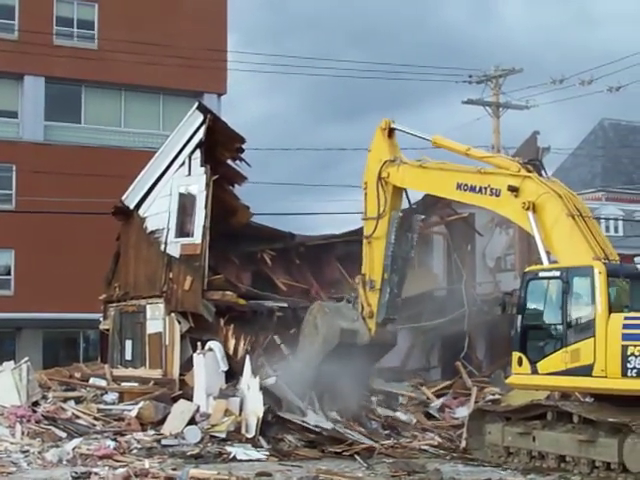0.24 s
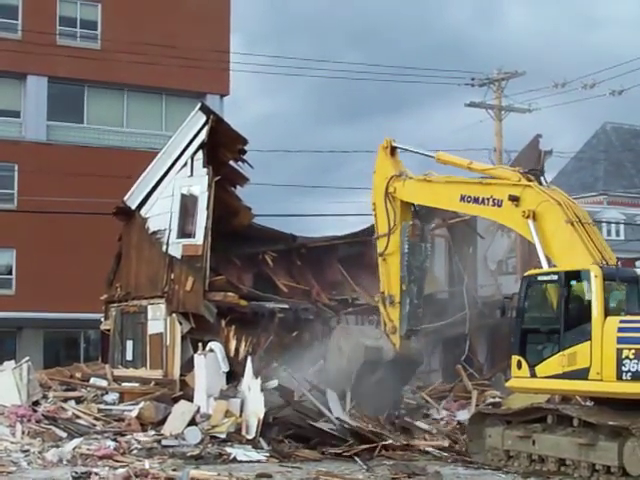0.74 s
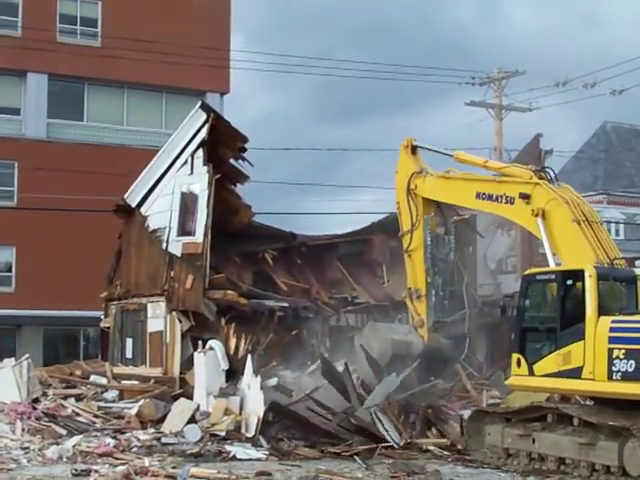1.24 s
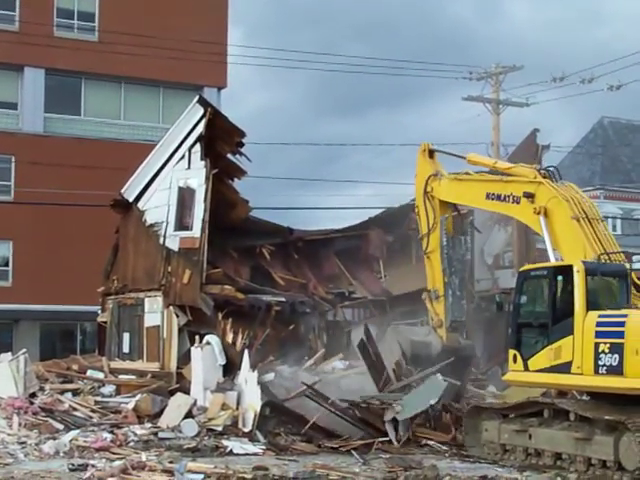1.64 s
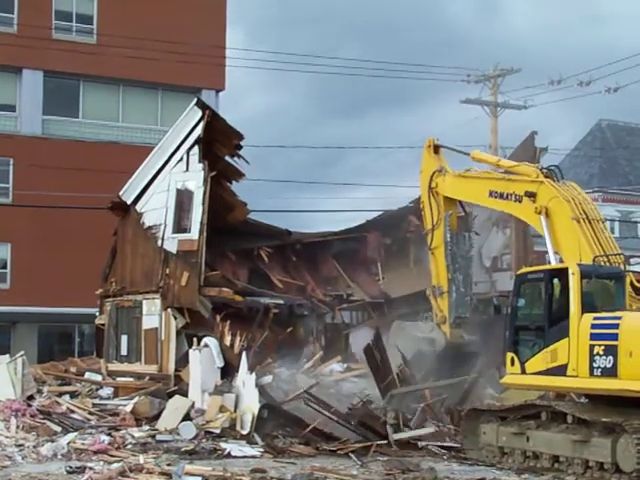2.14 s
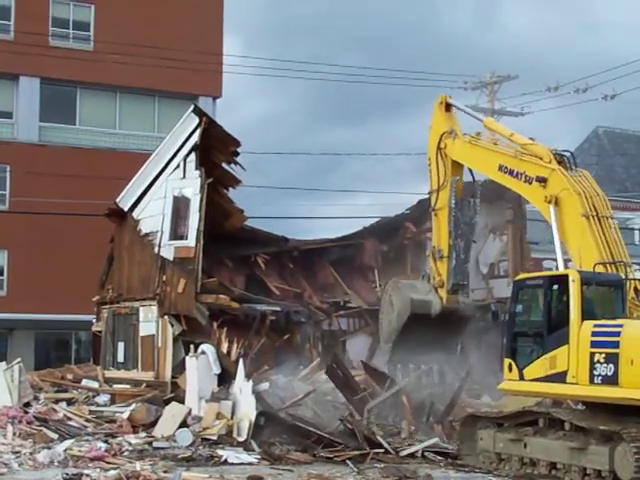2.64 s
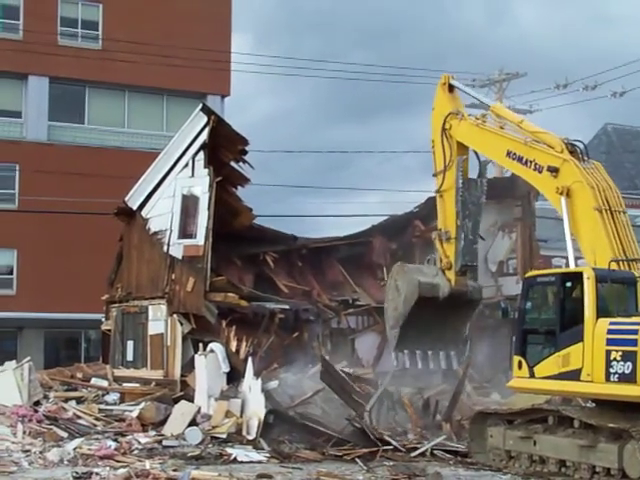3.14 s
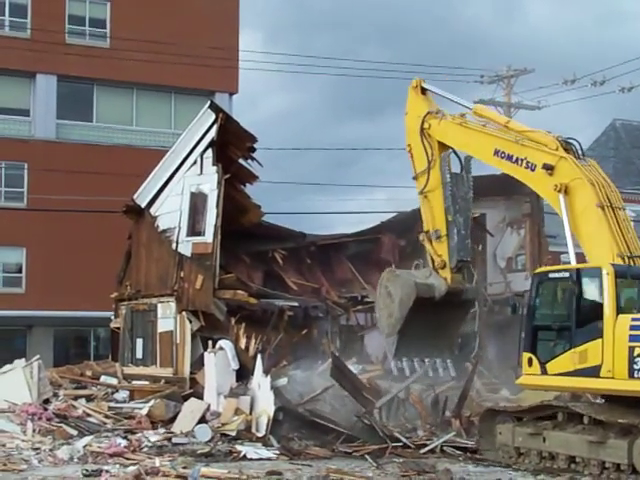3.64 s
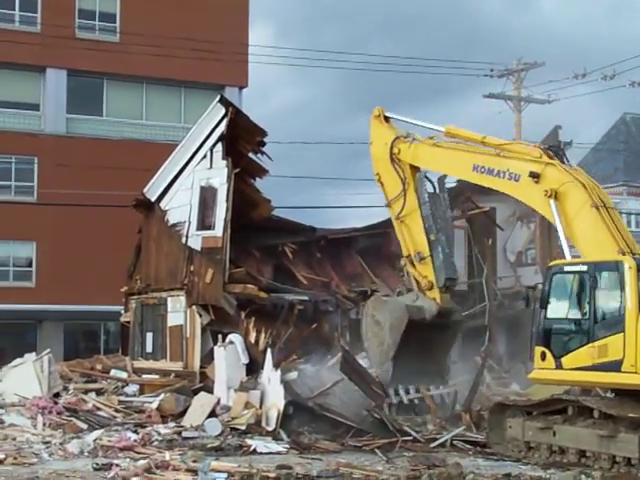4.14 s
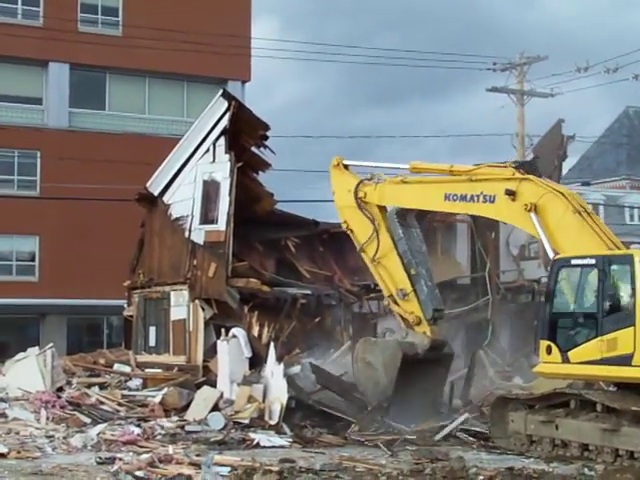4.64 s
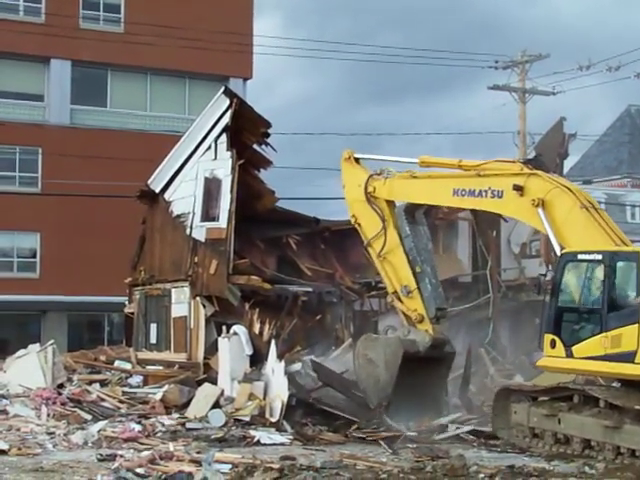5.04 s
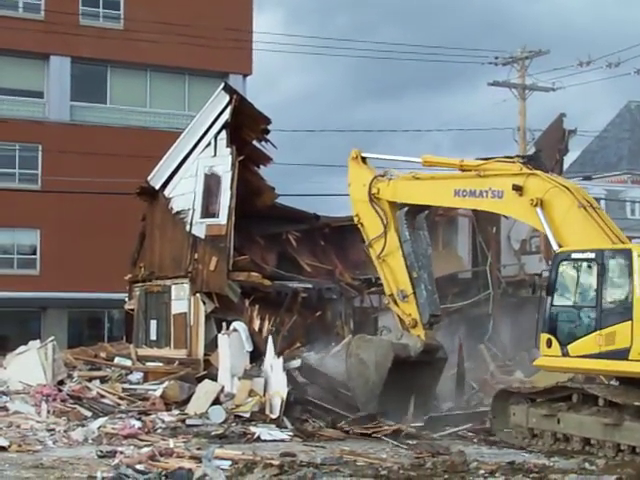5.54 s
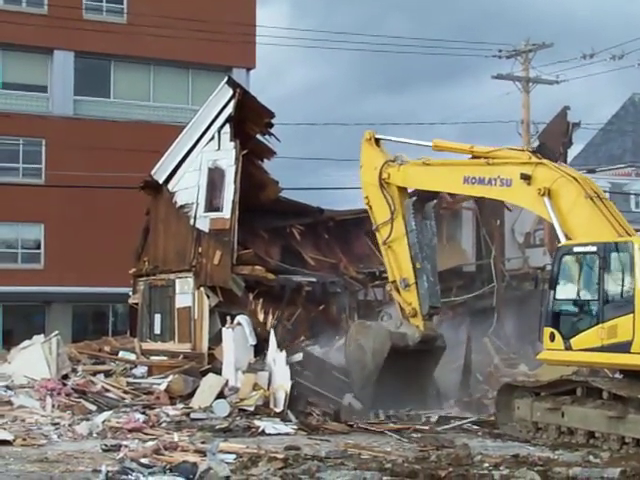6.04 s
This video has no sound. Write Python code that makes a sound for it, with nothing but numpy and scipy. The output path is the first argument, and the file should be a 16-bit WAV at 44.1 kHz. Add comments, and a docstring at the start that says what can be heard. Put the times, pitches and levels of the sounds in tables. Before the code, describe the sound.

From the start a diesel engine hums low and slightly unsteady, with a broad machine roar and boomy exhaust, while wind rumbles and thumps a small stereo camera microphone. In the first 2 s the bucket ploughs through wreckage: dry splinters pour, boards crack sharply around 0.2 and 0.45 s, and a thicker collapse crunches at about 1.1 s, another at 1.7 s. From 2 to 4 s the debris thins to light patter, small snaps and low beam knocks, with frequent hard wind puffs making the sound duck. Loose metal clinks dully near 4 s. At 4.4 s wood breaks again, peaking in the loudest cracking crash at 4.55-4.7 s. A plank clacks and bounces near 5 s; rubble surges at 5.25, 5.85 and 6.1 s over low hydraulic droning. Short street echoes follow the wreckage; a strong puff hits near 6.2 s.

```python
"""A diesel excavator drags its bucket through a wrecked wooden house: splinters and plaster pour down as
knocking fragments, and boards snap as short rings. The pile quiets while the bucket lifts, loose metal clinks
as damped modes near 4 s, and from 4.4 s the bucket comes down again and the hydraulics drone under load.
Throughout, the diesel hums at its firing rate, a brick block echoes the wreckage as a sparse noise tail, and
filtered noise rumbles as wind at two ports of a small camera; hard puffs make the limiter duck either side."""
import sys
import numpy as np
from scipy import signal
from scipy.fft import rfft, irfft
from scipy.io import wavfile
from scipy.ndimage import uniform_filter1d, map_coordinates

SR = 44100
rng = np.random.default_rng(int(sys.argv[2]) if len(sys.argv) > 2 else 0)


def pcm_store(signal):
    """Save signal as 16-bit PCM."""
    levels = np.round(np.clip(np.atleast_2d(signal), -1, 1) * 32767)
    wavfile.write(sys.argv[1], SR, levels.astype(np.int16).T)


N = 278271
TIME = np.arange(N) / SR
BINS = np.fft.rfftfreq(N, 1 / SR)


def amp(db):
    """Decibel law: level in dB to pressure gain."""
    return 10 ** (np.asarray(db) / 20)


def evened(x):
    """Normalisation of mean power: scales to rms 1."""
    return x / np.sqrt(np.mean(x ** 2) + 1e-20)


def read(points, hz):
    """Logarithmic pitch scale: interpolates a spectrum along log frequency."""
    f, value = np.transpose(points)
    return np.interp(np.log(hz + 1), np.log(f), value)


def curves(rows):
    """Linear interpolation: every column of a time table, at every sample."""
    s, *columns = np.transpose(rows)
    return [np.interp(TIME, s, c) for c in columns]


def lowpassed(x, hz, order):
    """Low-pass filtering without phase shift, at half gain at the given frequency."""
    return irfft(rfft(x) / (1 + (BINS / hz) ** order), N)


def coloured(x, colour):
    """Spectral shaping: multiplies the spectrum by a colour, then sets rms 1."""
    return evened(irfft(rfft(x) * amp(read(colour, BINS)), N))


def wander(rate):
    """Band-limited chance: noise of rms 1 with up to about this many turns a second."""
    return evened(lowpassed(rng.standard_normal(N), rate, 4))


def noise_pair(alike):
    """Partial coherence: white noise at two ports with a common share of power (0-1)."""
    common = rng.standard_normal(N)
    separate = rng.standard_normal((2, N))
    return np.sqrt(alike) * common + np.sqrt(1 - alike) * separate


def add(mix, s, sound):
    """Superposition: mixes a sound in from a given time."""
    part = mix[:, max(round(s * SR), 0):][:, :sound.shape[-1]]
    part += sound[..., :part.shape[1]]


def panned(x, pan_db):
    """Level difference between the ears: left over right, in dB."""
    return x * amp(np.array([[pan_db], [-pan_db]]) / 2)


def fragments(per_s, spread_db, top_hz, ring_s, size):
    """Random impacts of damped resonators, each with its own force, pitch, decay and place."""
    count = int(per_s * N / SR)
    when, force, pitch, damping, place = rng.random((count, 5)).T[:, :, None]
    t = np.arange(size) / SR
    decay_s = ring_s * 2 ** (2 * damping - 1)
    # a wider spread makes a few fragments much louder than the rest
    strength = amp(spread_db * np.minimum(-np.log(1 - force), 4)) / np.sqrt(decay_s)
    rings = strength * np.exp(-t / decay_s) * np.sin(2 * np.pi * pitch * top_hz * t)
    at = (when * N).astype(int) + np.arange(size)
    # off-centre fragments reach the nearer port a sample earlier
    arrivals = {1: at + 1, -1: at + (3 * place).astype(int)}
    pan_db = 4 * (2 * place - 1)
    ports = []
    for side in (1, -1):
        heard = rings * amp(side * pan_db / 2)
        ports.append(np.bincount(arrivals[side].ravel(), heard.ravel(), N)[:N])
    out = np.array(ports)
    return out - out.mean(axis=1, keepdims=True)


def collapse(s, build_s, dying_s):
    """Exponential growth and decay: the share of a falling section's peak power."""
    distance = np.maximum((s - TIME) / build_s, (TIME - s) / dying_s)
    return np.exp(-2 * np.minimum(distance, 20))


def shares(splinter_db, pan_db, bright_db):
    """Division of power: between coarse chips and fine grit, at each side."""
    sides = amp(np.array([pan_db, -pan_db]).reshape(2, -1) / 2) ** 2
    sides = sides / sides.mean(axis=0)
    return np.array([sides * amp(splinter_db + tilt * bright_db / 2) ** 2 for tilt in (-1, 1)])


# relative spectrum of splintering wood: pitch_hz, level_db
SPLINTER_COLOUR = [(500, -12.5), (900, -2), (1100, -3), (1370, -9), (1600, -1.5), (1950, -1.5),
                   (2550, -2.5), (3550, -0.5), (4700, -5.5), (6400, -11), (7300, -16.5), (7900, -31.5),
                   (8600, -40)]
# relative spectrum of knocking beams: pitch_hz, level_db
TIMBER_COLOUR = [(150, -6), (380, 7), (600, 1), (850, 3), (1120, 2.5), (1350, -10), (1800, 1.5),
                 (2600, -17.5), (5000, -33.5)]
# bucket ploughing through the pile: time_s, splinter_level_db, timber_level_db, left_over_right_db
DRAG = [(0, -28.5, -42, 13.5), (.4, -28, -30, 0.5), (.71, -27, -29.5, 2), (.76, -25, -32.5, -2),
        (1.3, -29, -31.5, 9), (1.65, -27.5, -32, 0), (2, -31.5, -40, 5), (2.35, -34, -42, 5.5),
        (2.8, -35.5, -33, 3.5), (3.1, -33.5, -34.5, -6), (3.5, -32.5, -31.5, -2), (3.85, -35, -33.5, 2.5),
        (4.2, -34, -34, 5.5), (4.5, -22.5, -35.5, 3), (4.88, -35, -30, 9.5), (5.1, -22, -31.5, -0.5),
        (5.45, -29, -31, 10), (5.7, -27, -32, 3.5), (6.31, -24.5, -36.5, -0.5)]
# sections that give way: peak_s, splinter_level_db, timber_level_db, build_s, dying_s, left_over_right_db,
# grit_over_chips_db
COLLAPSES = [(.195, -20, -30.5, 0.0086, 0.1, 15, 5), (0.753, -20.5, -46, 0.01, 0.048, -10, 9),
             (0.849, -15.5, -34.5, 0.028, 0.014, -3.5, 5.5), (0.989, -21, -43, 0.018, 0.02, -0.5, 9.5),
             (1.083, -12.5, -19, 0.0096, 0.048, 1, 0), (1.24, -22, -31, 0.11, 0.091, 3, -2),
             (1.74, -14.5, -25, 0.022, 0.03, 4.5, 3), (2.45, -30, -29.5, 0.12, 0.13, 24, 0),
             (3.05, -33, -27.5, 0.043, 0.075, -6.5, -13), (3.685, -28, -21.5, 0.014, 0.029, 5.5, 2),
             (4.4, -21, -29.5, 0.015, 0.037, 0, 10), (4.505, -17, -29, 0.033, 0.018, 0, 12),
             (4.556, -6.5, -22, 0.015, 0.042, -0.5, 4), (4.667, -15.5, -15, 0.077, 0.026, 2.5, 16.5),
             (4.808, -30.5, -23, 0.014, 0.028, -1, -22.5), (5.218, -22, -26.5, 0.022, 0.023, -4, 17.5),
             (5.275, -16.5, -24, 0.073, 0.088, 5, -2.5), (5.493, -22.5, -23, 0.011, 0.088, 13, 0),
             (5.849, -19.5, -40, 0.069, 0.017, 1, 0.5), (6.119, -16.5, -25, 0.053, 0.03, 4, 4.5)]


def pile():
    """Granular sound: many small impacts, steady under the bucket and surging as sections fall."""
    splinter_db, timber_db, pan_db = curves(DRAG)
    pouring = shares(splinter_db, pan_db, bright_db=1)
    knocking = amp(timber_db) ** 2
    for s, splinter_db, timber_db, build_s, dying_s, pan_db, bright_db in COLLAPSES:
        surge = collapse(s, build_s, dying_s)
        pouring = pouring + surge * shares(splinter_db, pan_db, bright_db)
        knocking = knocking + surge * amp(timber_db) ** 2
    clumps = wander(24)
    splinters = fragments(per_s=4000, spread_db=0.0, top_hz=8530, ring_s=0.00045, size=160)
    splinters = coloured(splinters, SPLINTER_COLOUR)
    coarse = lowpassed(splinters, 3200, 4)  # big chips sound below, fine grit above
    chips_gain, grit_gain = np.sqrt(pouring)
    splinters = coarse * chips_gain + (splinters - coarse) * grit_gain
    timber = fragments(per_s=700, spread_db=2.5, top_hz=2950, ring_s=0.002, size=640)
    timber = coloured(timber, TIMBER_COLOUR) * np.sqrt(knocking)
    return splinters * amp(1.36 * clumps) + timber * amp(0.4 * clumps)


# boards that snap: start_s, crack_level_db, pitch_hz, tearing_level_db, left_over_right_db
SNAPS = [(0.07, -14, 2700, -19, 3), (0.082, -17, 2480, -30.5, -3), (.1855, -11.5, 2060, -38, 8),
         (0.187, -2.5, 3680, -19, 16.5), (.376, -12, 1980, -30.5, 0.5), (0.4453, 4.5, 2300, -18, 1),
         (.785, -3.5, 4220, -15.5, -7), (1.071, -21, 1530, -13, -0.5), (1.082, -1.5, 3540, -19, 3.5),
         (1.158, 2.5, 3960, -12, 4), (1.388, -14, 1870, -25, 7.5), (1.877, -17, 2270, -20, -1.5),
         (1.968, -22, 3450, -21, 1.5), (2.033, -13.5, 2160, -23.5, 8.5), (2.259, -24, 4630, -29, 2),
         (2.48, -20, 933, -29, 4), (2.918, -16, 2070, -23, -1.5), (3.049, -21, 2050, -28, -2.5),
         (3.381, -18, 5040, -26, 2), (3.484, -7, 3200, -33.5, -2), (3.677, -14.5, 1730, -28.5, 0),
         (3.742, -17.5, 2770, -29, -5.5), (3.81, -19, 2390, -24, 0.5), (4.4212, 0.5, 3470, -14.5, 2),
         (4.5595, 1.5, 3470, -1, -2.5), (4.569, -1.5, 3430, -10.5, 5), (4.617, -4, 2020, -14.5, 2.5),
         (4.6198, 7.5, 2520, 0, 1.5), (4.851, -28, 2930, -17.5, 3.5), (4.934, -13, 3630, -20.5, 2),
         (5.217, -13, 6140, -10.5, 1.5), (5.776, -11, 3970, -17, 1), (5.841, -13, 3440, -24, 12),
         (5.895, -21, 3900, -17.5, 0), (6.092, -12, 3630, -18, 6.5), (6.166, -14, 3250, -20, 7.5),
         (6.261, -11, 3070, -17, 2)]


def snaps():
    """Brittle fracture: a sharp crack, then tearing fibres, both ring the resonance of one board."""
    out, t = np.zeros((2, N)), np.arange(SR // 6) / SR
    for s, crack_db, hz, tearing_db, pan_db in SNAPS:
        u = t * hz / 1.4  # the ring swells and dies within a few cycles
        tone = np.sin(2 * np.pi * hz * t)
        crack = (u * np.exp(1 - u)) ** 2 * tone
        board = np.exp(-t * hz / .7) * tone
        fibres = evened(signal.fftconvolve(rng.standard_normal(len(t)), board)[:len(t)])
        tearing = fibres * np.exp(-t / 0.011)
        add(out, s, panned(amp(crack_db) * crack + amp(tearing_db) * tearing, pan_db))
    return lowpassed(out, 7000, 16)  # keeps the snaps dull above 7 kHz


# beams and planks that drop: start_s, level_db, lowest_mode_hz
THUDS = [(.193, -14.5, 532), (.385, -12.5, 168.3), (1.1, -20.5, 204), (1.318, -17, 840), (1.38, -12.5, 166),
         (2.034, -19.5, 690), (2.478, -13, 553), (2.52, -18, 526), (2.719, -16, 678), (3.365, -10.5, 144),
         (3.01, -16, 166), (4.017, -18, 790), (5.464, -22, 466), (5.92, -14.5, 470)]
# modes of a beam: multiple_of_lowest_mode, level_db
BEAM_MODES = [(1, -2.5), (1.22, -8), (1.6, -10.5), (3.301, -14)]
THUD_CYCLES = 1.83  # periods until each mode is at its fullest


def thuds():
    """Modal vibration: a landing beam knocks on its modes; the lower the mode, the longer it rolls."""
    out, t = np.zeros((2, N)), np.arange(SR // 4) / SR
    for s, db, hz in THUDS:
        for (multiple, mode_db), start in zip(BEAM_MODES, rng.random(len(BEAM_MODES))):
            turns = t * hz * multiple
            u = turns / THUD_CYCLES
            swell = u * np.exp(1 - u)
            add(out, s, amp(db + mode_db) * swell * np.sin(2 * np.pi * (turns + start)))
    return out


def struck(blows, modes, rise_s, chatter, grit_db):
    """Modal impact: each blow crushes grit and rings one object's modes, whose phase (rad) chatters."""
    def dying(t60):
        """Exponential decay: 60 dB in t60 seconds, begun anew by every blow."""
        level = 0
        for s, db in blows:
            age = np.maximum(TIME - s, 0)
            level = level + amp(db - 60 * age / t60) * (1 - np.exp(-age / rise_s))
        return level

    out = amp(grit_db) * dying(t60=.08) * coloured(noise_pair(.8), SPLINTER_COLOUR)
    for hz, db, t60 in modes:
        out = out + amp(db) * dying(t60) * np.sin(2 * np.pi * hz * TIME + chatter * wander(160))
    return out


# blows as a hard plank lands and bounces: start_s, level_db
CLACKS = [(4.9605, -7), (4.9675, -6.5), (4.978, -13)]
# modes of the plank: pitch_hz, level_db, t60_s
PLANK_MODES = [(1965, -8, .055), (2180, -6, 0.053), (3580, -9.5, 0.046)]


def plank():
    """Repeated impact: a bouncing plank excites the same damped modes at every blow."""
    return struck(CLACKS, PLANK_MODES, rise_s=.0006, chatter=0.7, grit_db=-16)


# blows on a loose pipe: start_s, level_db
CLINKS = [(3.993, -16), (4.085, -23.5)]
# modes of the pipe: pitch_hz, level_db, t60_s
PIPE_MODES = [(1432, 1.5, 0.061), (2330, -6.5, .06), (3488, -9, .085)]


def pipe():
    """Inharmonic resonance: a struck loose pipe rings damped modes that form no harmonic series."""
    return struck(CLINKS, PIPE_MODES, rise_s=.002, chatter=.25, grit_db=-13)


# nails and sheet metal that drag: start_s, pitch_hz, width_hz, level_db, length_s
SCRAPES = [(1.919, 5319, 25, -23.5, 0.044), (2.918, 2150, 380, -30.5, 0.15),
           (5.476, 5170, 346, -23.5, 0.058)]


def scrapes():
    """Stick-slip friction: metal on wood squeals on one pitch, whose random phase drift widens the line."""
    out, t = np.zeros((2, N)), np.arange(SR // 4) / SR
    for s, hz, width_hz, db, length_s in SCRAPES:
        stroke = abs(np.sin(np.pi * np.sqrt(np.minimum(t / length_s, 1))))
        slips = uniform_filter1d(rng.standard_normal(len(t)), size=24)
        drift = np.cumsum(slips) * np.sqrt(2 * np.pi * width_hz / SR)
        add(out, s, amp(db) * stroke * np.sin(2 * np.pi * hz * t + drift))
    return out


# how far the left port leads in the wreckage layer over time: time_s, left_lead_us
LEAD = [(1.4, -2), (2.3, 40), (4.15, 48.5), (4.3, 4), (4.65, 4), (4.85, 29.5), (5.9, 16)]


def led(x):
    """Arrival-time difference: the right port hears the wreckage later as the left port leads more."""
    lead_us, = curves(LEAD)
    right = map_coordinates(x[1], [(TIME - lead_us / 10 ** 6) * SR], order=3)
    return np.array([x[0], right])


# diesel sagging under load: time_s, firings_per_s
SPEED = [(0, 92), (.45, 96), (.9, 91.5), (1.25, 90), (1.7, 97), (2.3, 92), (3, 92.5), (3.55, 96), (4.2, 93),
         (5.05, 87), (5.65, 93), (6.31, 88)]
# its firing tone: time_s, level_db
FIRING = [(0, -20.5), (.42, -17), (.6, -30.5), (.9, -18), (1.42, -27.5), (1.62, -15.5), (1.85, -21.5),
          (2.35, -27.5), (2.55, -15), (2.8, -22.5), (3.05, -22), (3.35, -26), (3.48, -15), (3.87, -22),
          (4.1, -35.5), (4.6, -27), (4.8, -21.5), (5.7, -24), (6.31, -27.5)]
# tones of the loaded hydraulics: pitch_hz, relative_level_db
DRONE = [(119.5, 1), (207, -9.5)]
# hydraulics loading up as the bucket presses down again: time_s, level_db
LOAD_DRONE = [(0, -37.5), (4.55, -44), (4.75, -24.5), (5.08, -27.5), (5.33, -18), (5.85, -30), (6.1, -23.5),
              (6.31, -21.5)]
# fan, tracks and steelwork: time_s, level_db
ROAR = [(0, -27), (.3, -23.5), (.8, -30.5), (1.4, -26.5), (2.5, -28), (3.3, -26), (3.9, -30), (4.4, -33.5),
        (5.2, -29.5), (6, -25.5), (6.31, -24.5)]
# relative spectrum of that roar: pitch_hz, level_db
ROAR_COLOUR = [(150, -22), (300, -0.5), (400, 2.5), (540, 2.5), (680, -4.5), (1050, -10.5), (1400, -14),
               (3000, -21.5), (7000, -45)]
# relative spectrum of the exhaust boom: pitch_hz, level_db
BOOM_COLOUR = [(50, -21), (85, -2.5), (120, 5), (155, 0), (210, -5), (260, -8), (330, -21), (600, -68.5)]
BOOM_DB = -19.5


def excavator():
    """Periodic excitation: firings hum in the exhaust and modulate noise; loaded hydraulics drone."""
    speed, = curves(SPEED)
    firing_db, = curves(FIRING)
    drone_db, = curves(LOAD_DRONE)
    roar_db, = curves(ROAR)
    firing = 2 * np.pi * np.cumsum(speed * (1 + 0.0081 * wander(10.5))) / SR
    exhaust = evened(np.sin(firing) + .16 * np.sin(2 * firing) + .05 * np.sin(4.5 * firing))
    exhaust = exhaust * amp(firing_db + 2 * wander(6.7))
    drone = 0
    for hz, db in DRONE:
        turns = np.cumsum(hz * (1 + 0.0067 * wander(6.1))) / SR
        drone = drone + amp(db) * evened(np.sin(2 * np.pi * turns))
    drone = panned(drone, pan_db=-2) * amp(drone_db + 1.9 * wander(6.6))
    beat = 1 + 0.13 * np.cos(firing)
    roar = coloured(noise_pair(0.43) * beat, ROAR_COLOUR) * amp(roar_db + 1.6 * wander(12))
    boom = coloured(noise_pair(0.3) * beat, BOOM_COLOUR) * amp(BOOM_DB + 2.2 * wander(4.5))
    return exhaust + drone + roar + boom


# reverberation time of the street: pitch_hz, t60_s
STREET = [(100, 0.65), (1000, 0.33), (4000, 0.49), (8000, 0.3)]


def street(x):
    """Reverberation: sparse echoes from rubble and walls, with a decay time set by frequency."""
    shape = (2, SR // 2)
    taps = rng.standard_normal(shape) * (rng.random(shape) < 2500 / SR)  # about 2500 echoes a second
    hz, t, z = signal.stft(taps, SR, nperseg=256)
    decay = amp(-60 * t / read(STREET, hz)[:, None])
    tail = signal.istft(z * decay, SR, nperseg=256)[1]
    tail = tail / np.linalg.norm(tail, axis=1, keepdims=True)
    return signal.fftconvolve(x, tail, axes=1)[:, :N]


# relative spectrum of the wind: pitch_hz, level_db
WIND_COLOUR = [(8, -3), (22, 6.5), (45, 1.5), (70, 1), (100, -4), (180, -17), (400, -72.5)]
# strength of the wind: time_s, level_db
BREEZE = [(0, -12), (.5, -10.5), (1.1, -17.5), (2, -10), (2.8, -9.5), (3.5, -13.5), (4.2, -10), (4.7, -17),
          (5.4, -16), (6.31, -11)]


def wind():
    """Turbulent pressure: low noise mostly separate at each port, with chance slaps of air."""
    wind_db, = curves(BREEZE)
    lumps = np.array([wander(9.3), wander(7.6)])
    buffets = coloured(noise_pair(0.24), WIND_COLOUR) * amp(1.1 * lumps)
    u = np.linspace(-5, 5, 900)
    slap = (1 - u ** 2) * np.exp(-u ** 2 / 2)
    hits = rng.uniform(-1.7, 1, (2, N)) * (rng.random((2, N)) < 5 / SR)  # about 5 a second at each port
    slaps = amp(3.5) * signal.oaconvolve(hits, slap[None], "same", axes=1)
    return (buffets + slaps) * amp(wind_db)


# hard puffs of wind that overload a port: peak_s, level_db, port (L, R or both)
PUFFS = [(0.095, 9.5, "R"), (0.238, 14.5, "L"), (0.581, 7.5, "L"), (0.618, 9.5, "R"), (1.646, 8, "R"),
         (1.784, 12.5, "R"), (2.056, 8, "R"), (2.27, 10.5, "R"), (2.366, 13, "L"), (2.514, 9, "L"),
         (2.588, 11.5, "R"), (2.651, 6.5, "L"), (2.706, 13.5, "L"), (2.791, 16, "L"), (2.799, 15, "R"),
         (2.951, 9.5, "L"), (3.08, 10, "L"), (3.209, 8, "L"), (3.217, 10, "R"), (3.405, 12.5, "L"),
         (3.53, 10.5, "L"), (3.621, 11, "R"), (3.931, 7, "R"), (4.114, 12, "L"), (4.225, 9, "LR"),
         (5.06, 13.5, "R"), (5.692, 11, "L"), (6.214, 17, "L")]
PUFF_S = .0036  # from the peak to 1/e of it


def puffs():
    """Pressure pulse: each hard puff is one smooth Gaussian push on a port."""
    out, t = np.zeros((2, N)), np.arange(-SR // 50, SR // 50) / SR
    for s, db, port in PUFFS:
        push = amp(db) * np.exp(-(t / PUFF_S) ** 2)[s + t >= 0]
        add(out, s + t[0], np.outer(["L" in port, "R" in port], push))
    return out


def scene():
    """Superposition: wreckage with its echoes, the machine and the wind."""
    wreckage = led(pile() + snaps() + thuds() + pipe() + plank() + scrapes())
    return wreckage + amp(-8.0) * street(wreckage) + excavator() + wind() + puffs()


LIMIT_DB, LIMIT_ATTACK_S, RECOVER_DB_PER_S = 1.5, 0.000068, 84


def limiter(x):
    """Gain control by peaks: each channel drops fast when over the limit and creeps back up."""
    over_db = np.maximum(20 * np.log10(abs(x) + 1e-9) - LIMIT_DB, 0)
    recovery = RECOVER_DB_PER_S * TIME
    held_db = np.maximum.accumulate(over_db + recovery, axis=1) - recovery
    r = np.exp(-1 / (LIMIT_ATTACK_S * SR))
    cut_db = signal.lfilter([1 - r], [1, -r], held_db + 1e-9, axis=1)
    return x * amp(-cut_db)


# level difference of the two ports: pitch_hz, left_over_right_db
PORT_DB = [(60, 0), (300, -4), (1150, -4), (1480, 1.5), (2000, -3), (3100, 5.5), (4200, 2.5), (5300, -2),
           (6800, -5), (8000, -4)]
# phase difference of the two ports: pitch_hz, left_lead_rad
PORT_PHASE = [(60, -0.1), (900, -0.1), (1320, 1.4), (1600, 0.0093), (2700, 0.87), (4000, -0.4),
              (7400, 0.077)]
# notch filters in the camera against motor noise: pitch_hz, width_hz, depth (0-1)
NOTCHES = [(299, 86, 0.78), (968, 56, 1)]
WIND_CUT_HZ, EDGE_HZ = 112, 8400  # bass cut against wind, upper band limit


def record(dry):
    """Linear filtering around overload: port colour, limiter, notches, bass cut, clipping, band limit."""
    half = amp(read(PORT_DB, BINS) / 2) * np.exp(1j * read(PORT_PHASE, BINS) / 2)
    x = limiter(irfft(rfft(dry) * np.array([half, 1 / half]), N))
    response = 1j * BINS / (WIND_CUT_HZ + 1j * BINS)
    for hz, width, depth in NOTCHES:
        response = response * (1 - depth / (1 + 1j * (BINS ** 2 - hz ** 2) / (width * BINS + 1)))
    x = np.clip(irfft(rfft(x) * response, N), -.95, .95)
    band = signal.firwin(111, EDGE_HZ, window=("kaiser", 8), fs=SR)
    return signal.oaconvolve(x, band[None], "same", axes=1)


dry = scene()
out = record(dry)
pcm_store(out)
```